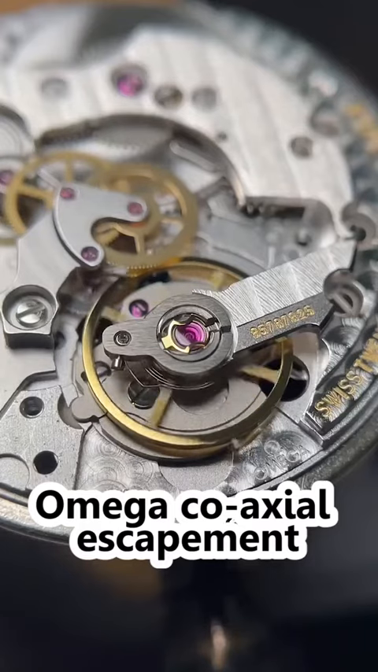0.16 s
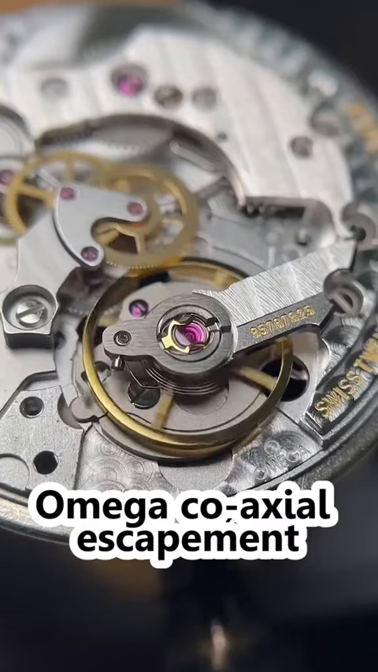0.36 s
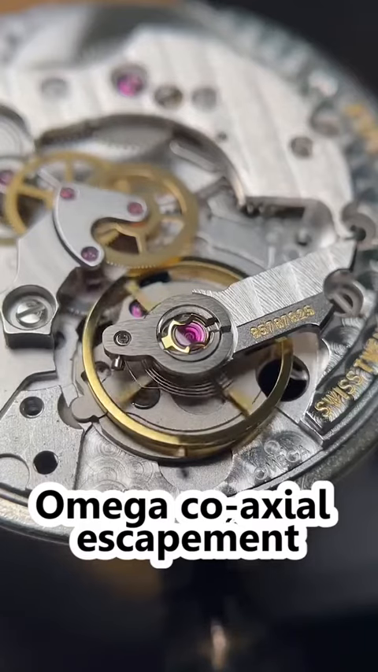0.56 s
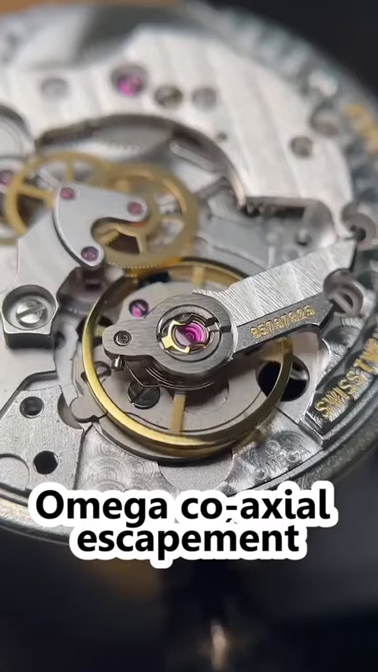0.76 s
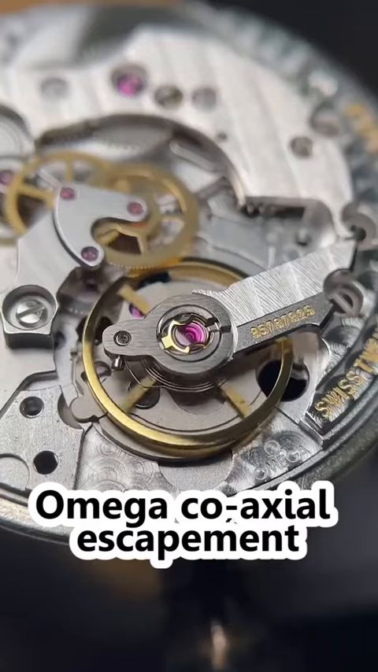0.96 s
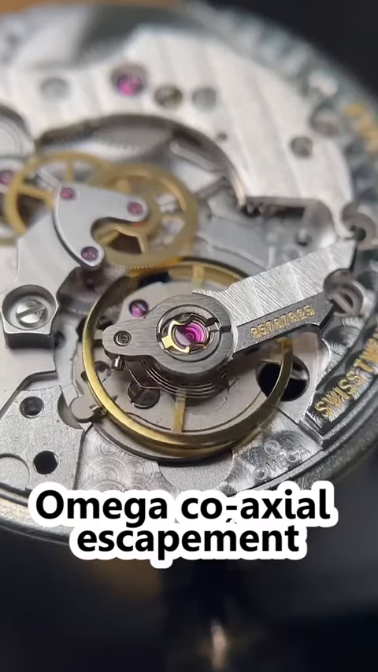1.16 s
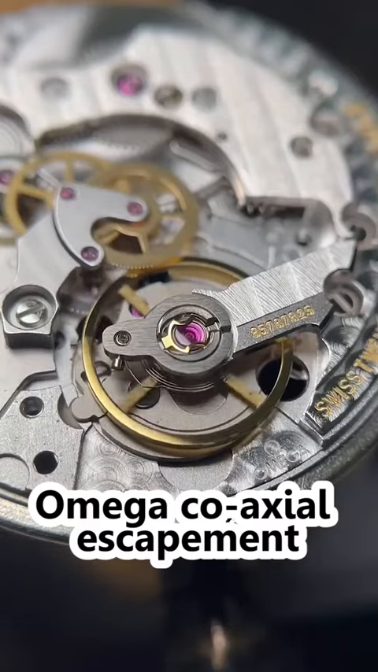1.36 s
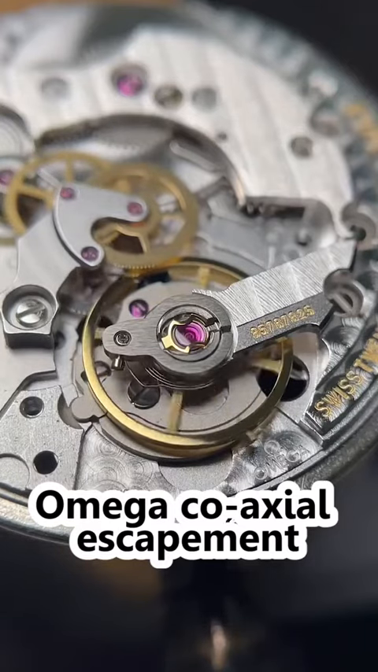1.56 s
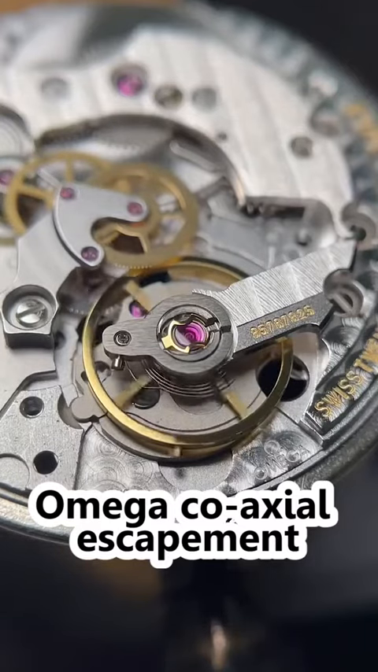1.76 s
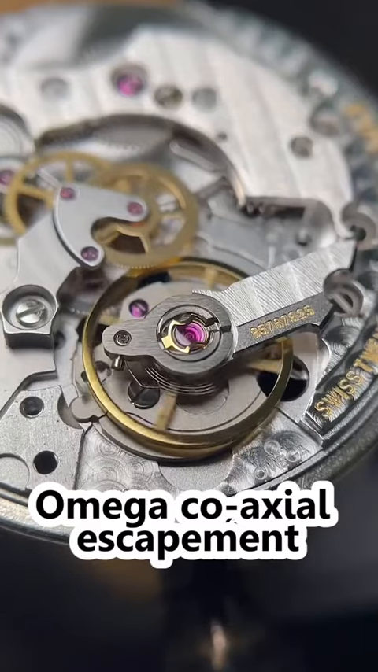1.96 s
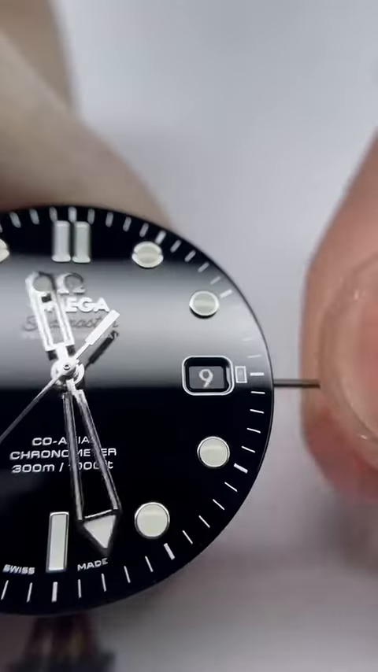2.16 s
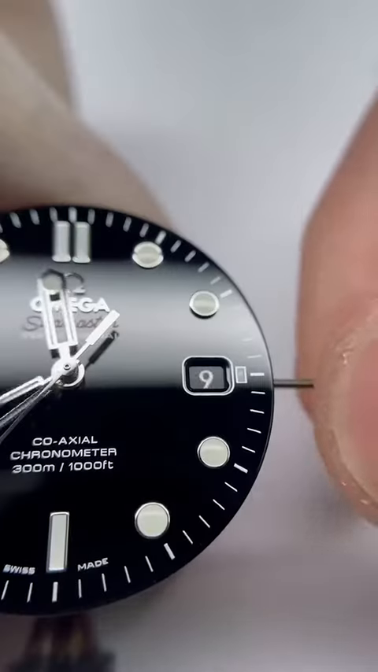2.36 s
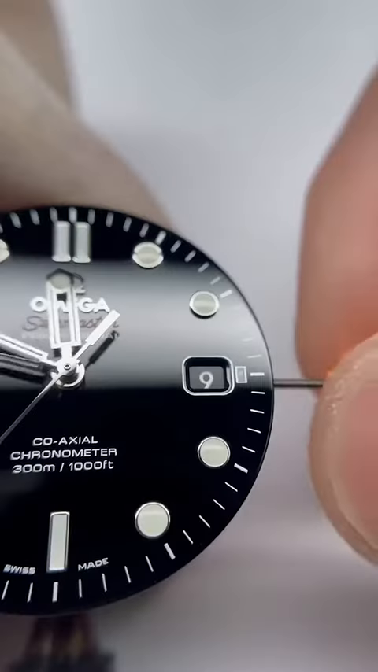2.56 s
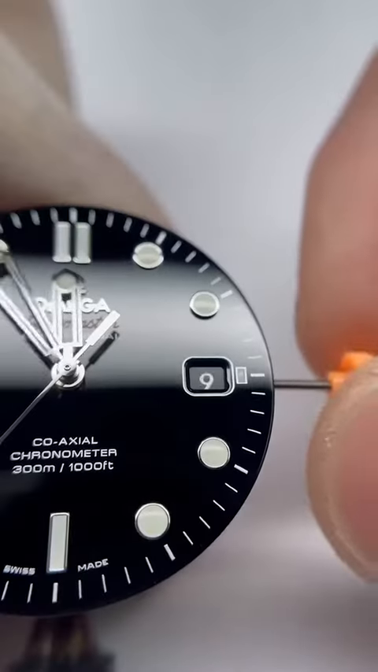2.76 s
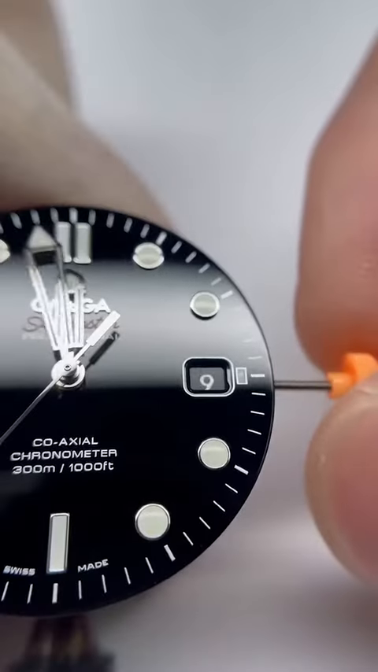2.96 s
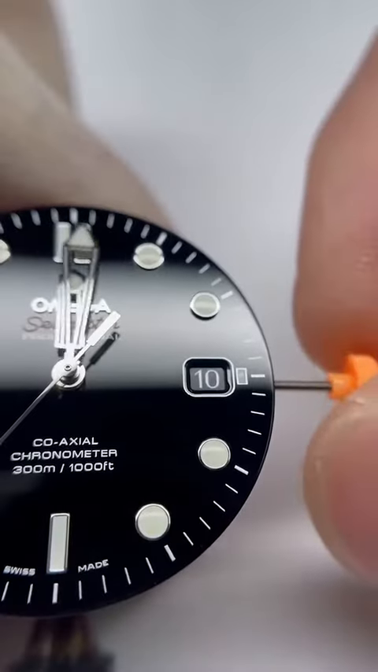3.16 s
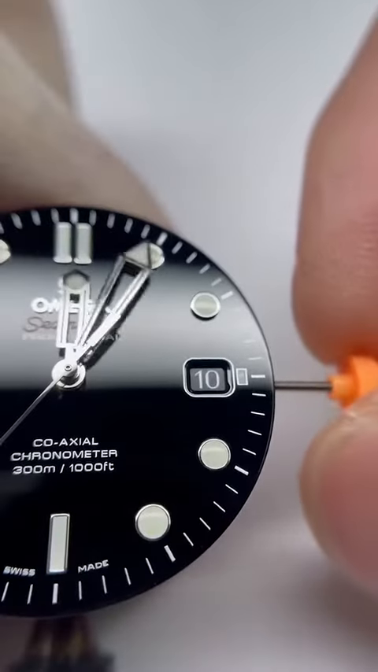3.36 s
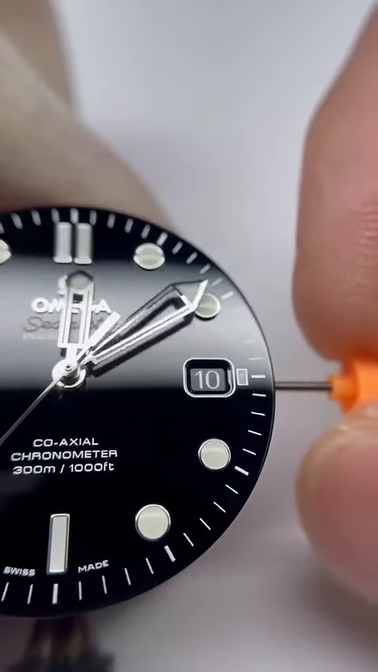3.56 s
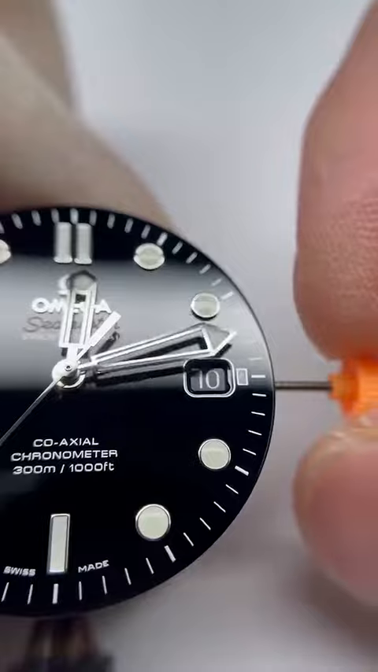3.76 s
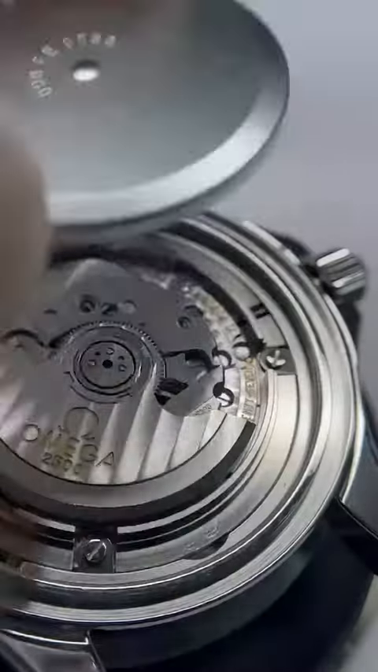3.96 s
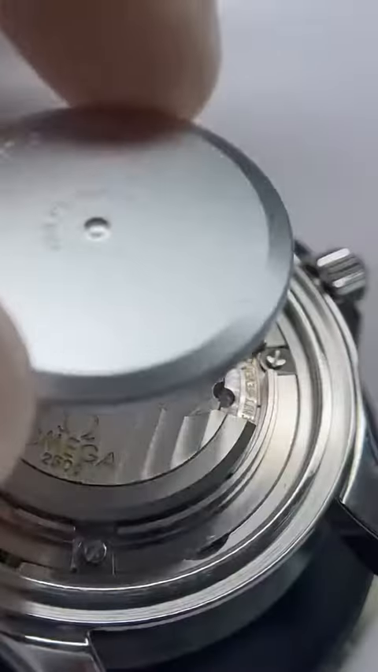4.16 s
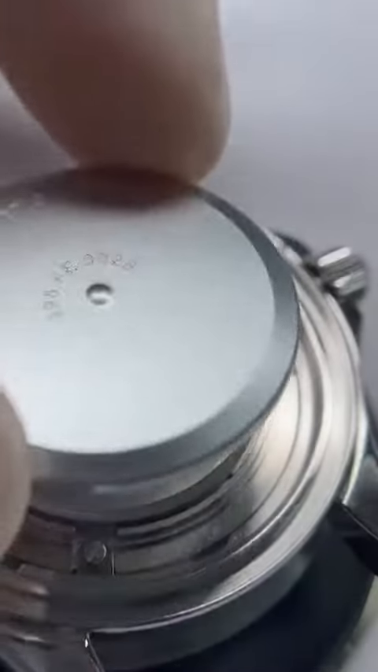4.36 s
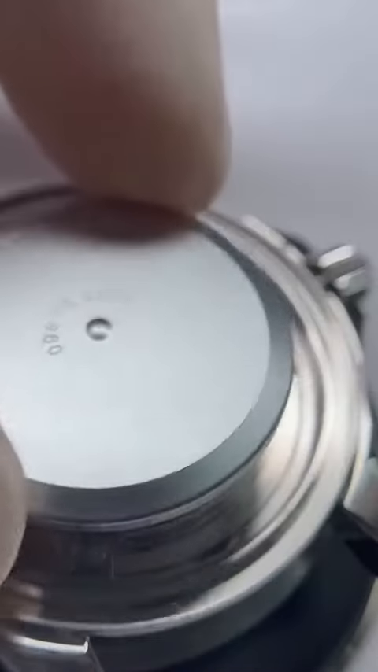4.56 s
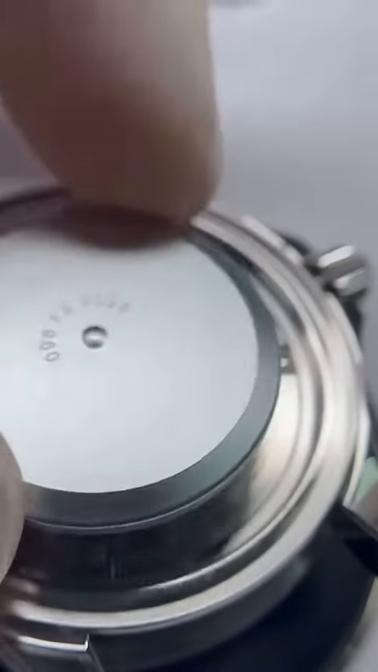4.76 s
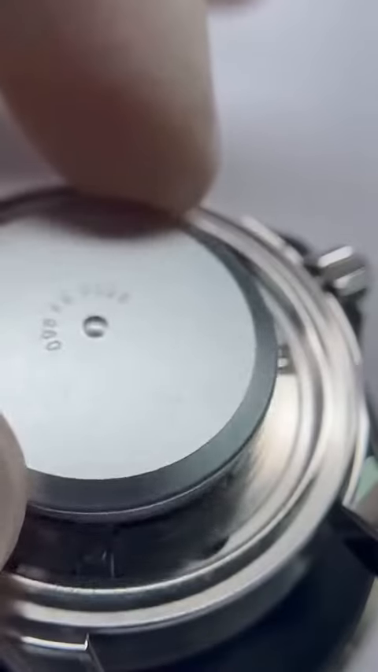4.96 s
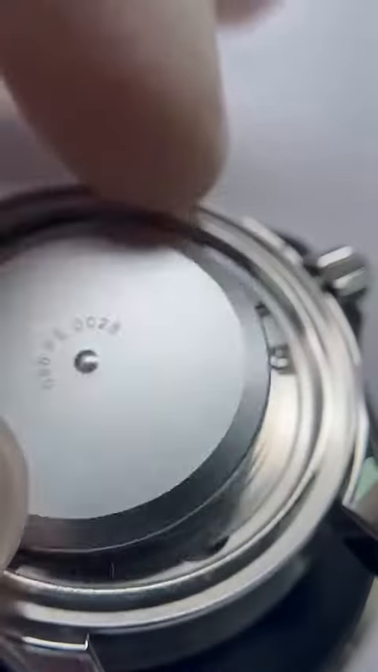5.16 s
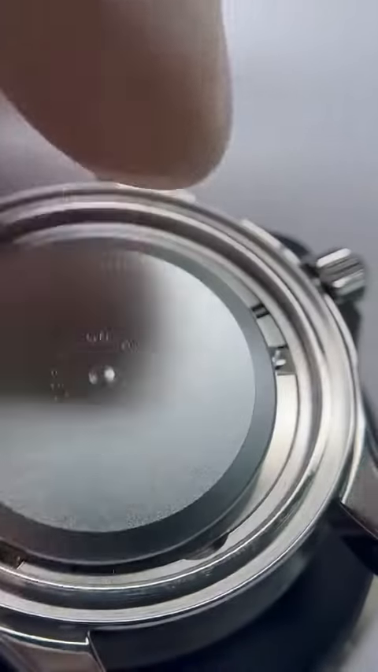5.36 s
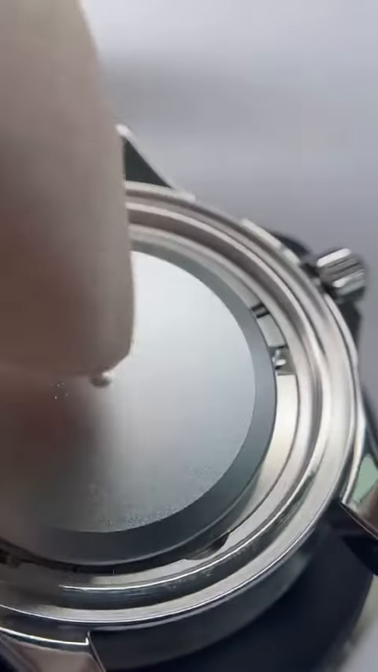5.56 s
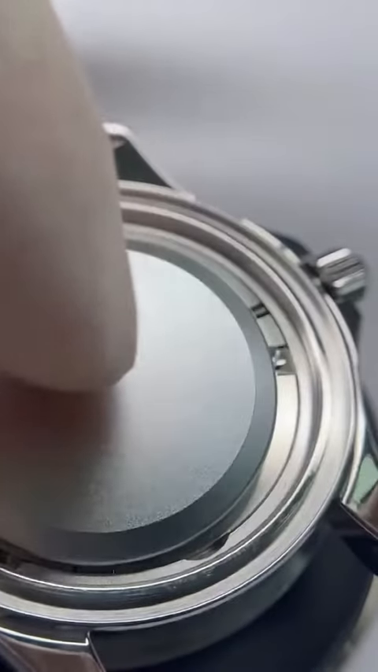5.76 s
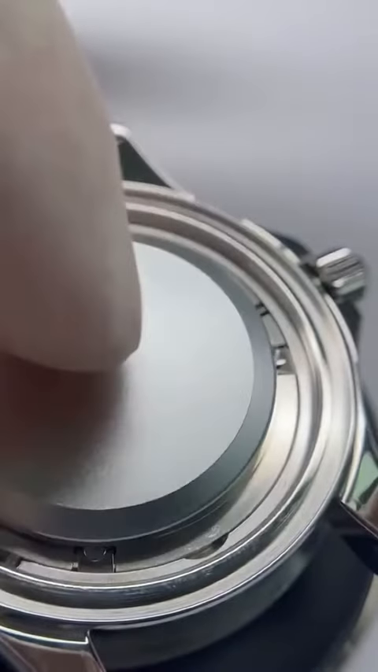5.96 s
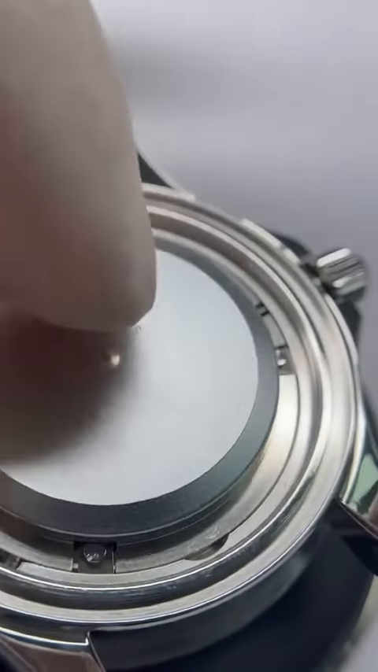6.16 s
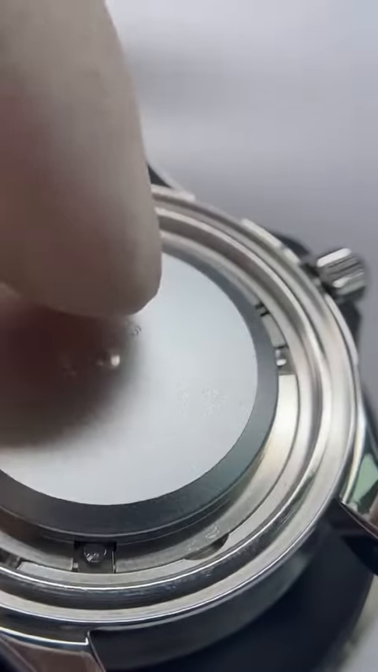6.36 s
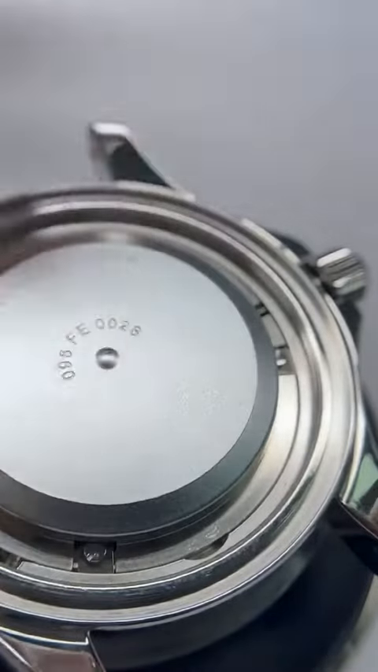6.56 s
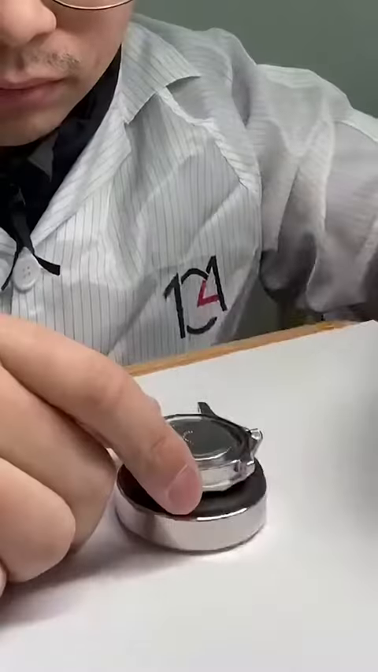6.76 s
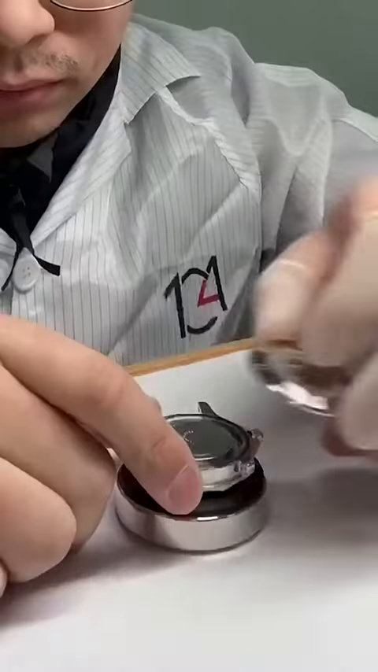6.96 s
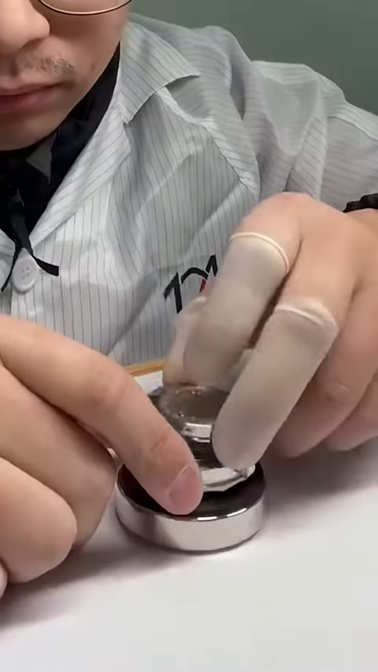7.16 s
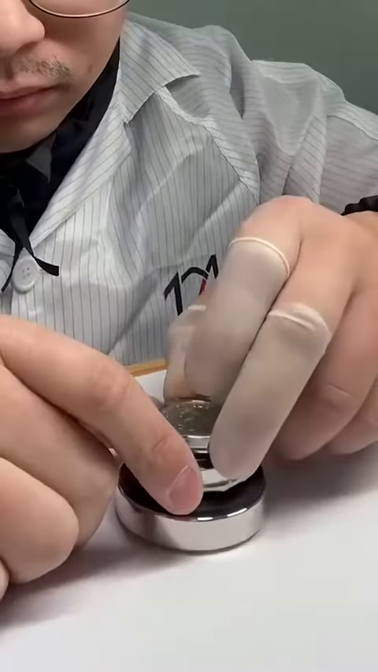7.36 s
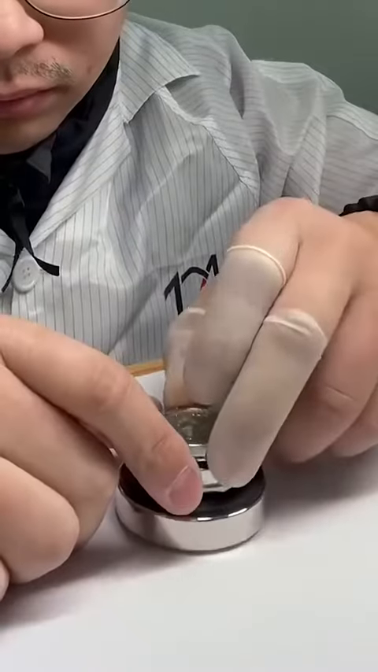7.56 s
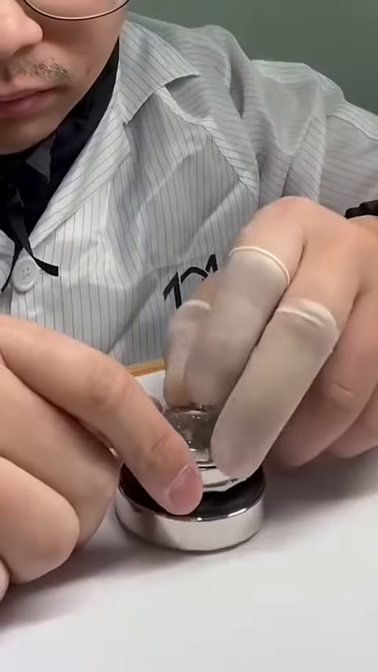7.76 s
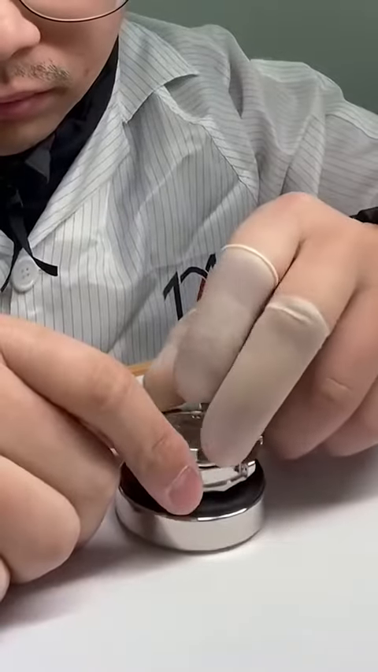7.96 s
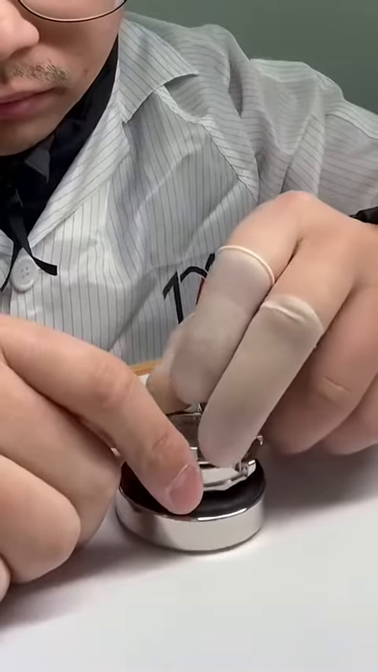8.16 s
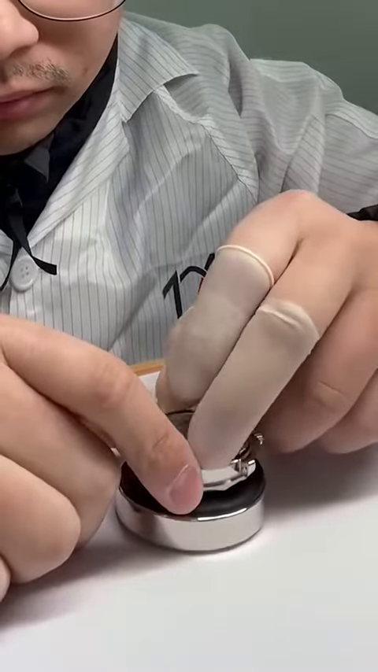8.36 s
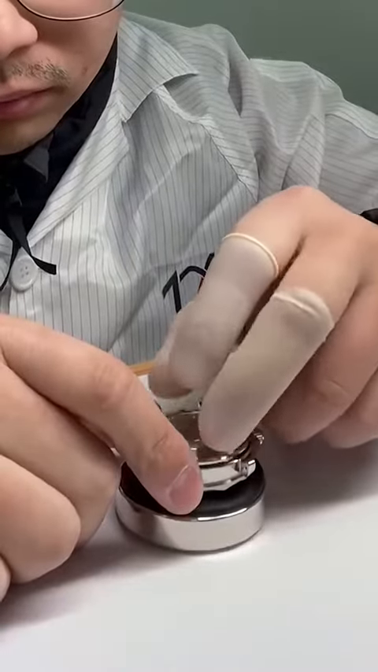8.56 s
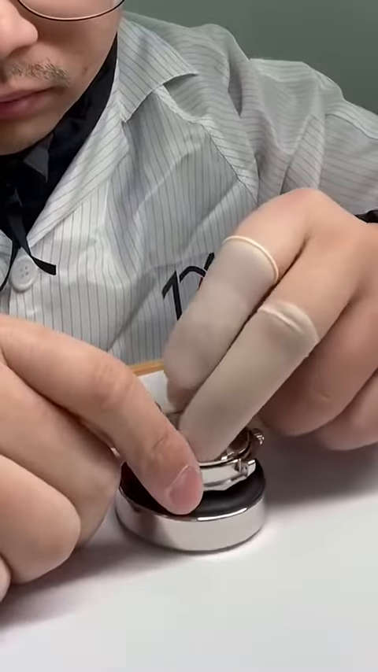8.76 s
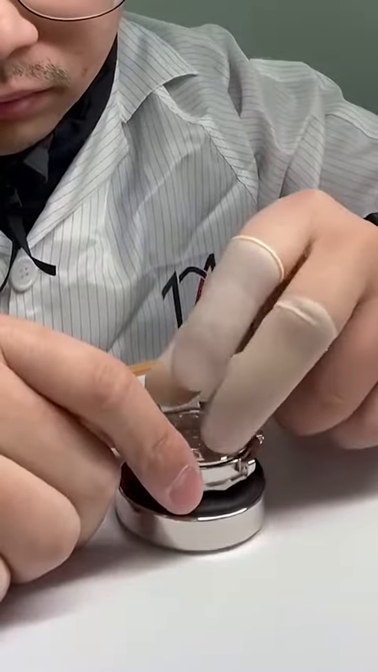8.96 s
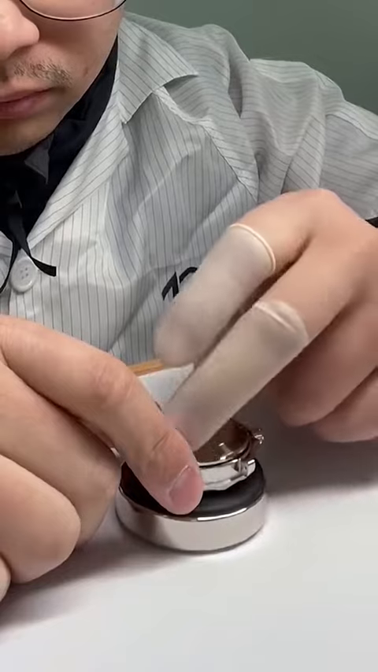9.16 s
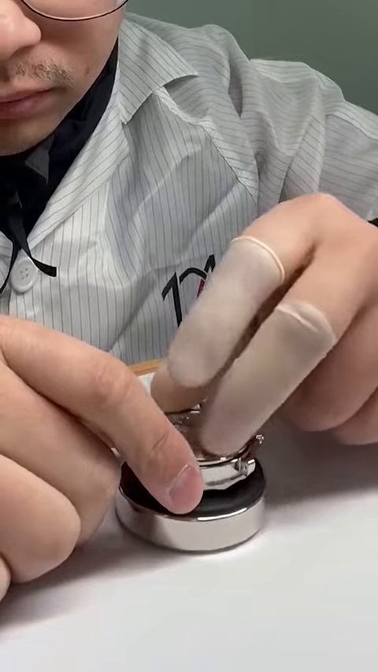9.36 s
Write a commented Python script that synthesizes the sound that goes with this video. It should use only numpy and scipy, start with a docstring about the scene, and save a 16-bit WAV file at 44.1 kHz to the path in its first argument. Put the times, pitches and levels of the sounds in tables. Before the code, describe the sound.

A watch ticks rapidly and its stem snaps out, then a thin steel cover clatters into place and the case back clicks shut.

```python
"""A bare watch escapement ticks seven times a second, close by, over a soft room tone and mains hum. The
winding stem snaps out with a thump, and later the movement ticks faintly inside its case. A thin steel inner
cover clatters onto the case, each impact exciting its bending modes. Last, the heavy back is set down and
turned: it clicks by impact and scrapes by friction in its thread. The room tone changes its colour in four
stretches."""
import sys
import numpy as np
from scipy import signal
from scipy.fft import rfft, irfft, next_fast_len
from scipy.io import wavfile
from scipy.ndimage import uniform_filter1d

SR = 44100
rng = np.random.default_rng(int(sys.argv[2]) if len(sys.argv) > 2 else 0)


def int16_out(signal):
    """Quantize to a 16-bit WAV file."""
    q = np.round(np.clip(np.atleast_2d(signal).T, -1, 1) * 32767)
    wavfile.write(sys.argv[1], SR, q.astype(np.int16))


N = 415863
T = np.arange(N) / SR
RING_T = T[:3 * SR // 5]  # time axis of a free decay
LEAD = SR // 50  # samples ahead of a contact's peak

# Boundaries of the four stretches of room tone, in seconds.
STRETCH_EDGES_S = [0, 1.648, 3.37, 6.15, 9.6]
# Level of the room tone in each stretch, in dB.
AIR_LEVELS_DB = [-54.5, -49, -53.5, -57.5]
# Room tone spectra of the four stretches. Each row: frequency in Hz, relative level in dB.
AIR_FIRST = [(12, -35), (20, 11), (58, -7), (146, -13), (198, -11.5), (718, -16), (849, -17),
             (1030, -17), (2390, -25.5), (2670, -23), (3340, -26), (4670, -22), (6720, -35.5),
             (9670, -28), (16000, -40)]
AIR_SECOND = [(12, -24.5), (20, 6), (39, -6.5), (96, -20), (182, -13.5), (472, -14), (642, -21.5),
              (738, -16.5), (3740, -42.5), (4300, -43), (5080, -45.5), (16000, -50)]
AIR_THIRD = [(12, -23), (20, 0.5), (120, -29), (241, -27), (624, -35), (678, -28.5), (759, -34),
             (923, -32.5), (2600, -43.5), (3160, -42.5), (16000, -53)]
AIR_FOURTH = [(12, -68), (20, 1.5), (53, -2), (107, -20), (130, -11), (248, -12), (558, -15),
              (825, -14.5), (1060, -17), (1220, -15), (2910, -28.5), (16000, -38.5)]
# Mains harmonics. Each row: frequency in Hz, level in dB.
HUM_PARTIALS = [(50, -57.5), (100, -64.5), (200, -71.5), (850, -71), (950, -71.5), (1250, -73.5)]

# Dull bumps of handling. Each row: centre in seconds, level in dB, width in seconds.
HAND_BUMPS = [(2.68, -43, 0.051), (3.36, -44, 0.023), (5.84, -55, .025), (6.02, -53, 0.031)]
# Spectra of a bump and of a brush of the hand. Each row: frequency in Hz, relative level in dB.
BUMP_SPECTRUM = [(25, 12.5), (110, -4.5), (300, -11), (1200, -40), (8000, -62)]
BRUSH_SPECTRUM = [(400, -17), (1000, 1.5), (2300, 1.5), (5000, -5.5), (9000, -16), (16000, -17)]

# Responses of the movement plate, the stem, steel on steel, and the case clamped in its holder.
# Each row: frequency in Hz, relative level in dB.
PLATE_SPECTRUM = [(700, -18.5), (1500, 2), (2400, -4), (2800, 1), (3300, -3), (4000, 4.5), (4700, 6.5),
                  (5600, -1), (6700, -16.5), (8300, -6), (9200, 6), (11000, -1.5), (13000, -13.5),
                  (16000, -18)]
STEM_SPECTRUM = [(70, -8.5), (170, 0), (340, -3), (550, -8.5), (1000, -10), (1900, 0), (2750, 4),
                 (3100, -13), (4500, -4), (7000, -8.5), (8000, 2.5), (10500, -6.5), (12000, -5.5),
                 (16000, -11)]
CLACK_SPECTRUM = [(130, -22), (380, -16), (680, -5), (1050, -6.5), (1700, -3.5), (2500, -2.5), (2900, 0),
                  (3600, -9), (4200, 14.5), (5000, -9), (5700, 5.5), (6500, 1.5), (7800, 0.5), (13000, -6)]
CASE_SPECTRUM = [(130, -18), (450, -10.5), (1000, 4), (1800, 0), (2300, 7.5), (3200, -5.5), (4450, 2.5),
                 (5100, -7.5), (7200, 0), (9500, -5), (11000, -10), (12000, -1.5), (12900, -0.5),
                 (13500, -16)]

# Modes of the escapement's fine steel parts, the hairspring, the case with its back, and the cover.
# Each row: frequency in Hz, relative level in dB, t60 in seconds.
FINE_PART_MODES = [(9150, -13, .2), (11900, -22, .3)]
HAIRSPRING_MODES = [(4780, -68, .7), (4900, -66, .7)]
CASE_BACK_MODES = [(2180, -13, .025), (2560, -14, .02), (4480, -17, .015), (6800, -18, .02),
                   (11800, -14, .025), (12380, -13, .028), (2350, -42, .28), (7250, -39, .25),
                   (12600, -35, .14)]
COVER_CLACK_MODES = [(4100, -15.5, 0.042), (7300, -13, 0.044), (7040, -10, 0.04), (7550, -7, 0.14),
                     (7700, -9, 0.053), (7970, -8, 0.057), (8290, -8, 0.044), (9900, -13, 0.066),
                     (11250, -11.5, 0.045), (11170, -15.5, .06)]

# Knocks of the back on the case. Each row: time in seconds, strength in dB, holder's thud gain in dB.
CASE_KNOCKS = [(6.9998, -14.5, -14), (7.1030, -12.5, 3.5), (7.1500, -33.5, -14), (7.1567, -31.5, -8),
               (7.4500, -20, 1), (7.6003, -20.5, 0.5), (7.838, -34.5, -8.5), (7.9, -42.5, -13),
               (8.0562, -14, 7.5), (8.0828, -9.5, 24.5), (8.205, -21.5, -1), (8.413, -13.5, -6),
               (8.5795, -36, -1), (8.7500, -20, -3.5), (8.8051, -30.5, -23), (8.867, -23, -11.5),
               (8.9144, -30.5, -15), (9.0975, -19.5, -8), (9.143, -30.5, -18), (9.2300, -23, -1),
               (9.4101, -31, -15)]
# Turns of the back in its thread. Each row: start in seconds, end in seconds, level in dB.
THREAD_TURNS = [(7.796, 7.906, -61), (8.142, 8.237, -55.5), (8.484, 8.572, -52.5), (8.815, 8.902, -51.5),
                (9.131, 9.212, -45)]

# Hard blows of the cover on the case. Each row: time in seconds, clack strength in dB,
# tilt in dB per octave, ring level in dB, ring t60 in seconds.
COVER_IMPACTS = [(4.535, -17.5, -0.5, -16.5, .08), (4.634, -23, -2.5, -18.5, .25),
                 (4.6478, -6.5, 1.5, -9, 0.16), (4.6504, -10, 5.5, -7.5, .07), (4.657, -10.5, 8.5, -19, .1),
                 (5.323, -27, -0.5, -25.5, 0.029), (5.3798, -19.5, 2, -19.5, .019),
                 (5.6115, -32.5, -5, -25.5, .051), (5.6172, -20.5, -2.5, -11.5, 0.094),
                 (5.6376, -12.5, -1.2, -28, .06)]
# The cover rattling to rest. Each row: start in seconds, length in seconds, first clack strength in dB,
# tilt in dB per octave, first ring level in dB, last ring level in dB, last ring t60 in seconds.
COVER_RATTLES = [(4.544, 0.036, -21, 0, -26, -43, 0.24), (4.6741, .097, -15, 2.5, -11.5, -42, 0.7),
                 (5.334, 0.039, -35, -4, -35.5, -59.5, .08), (5.401, .02, -35, -4.5, -38.5, -56, 0.09),
                 (5.6415, .017, -17.5, -0.5, -22.5, -44, 0.24)]

BEATS_PER_S = 7
BEND_HZ = 4312  # the cover's bending note
LN_1000 = np.log(1000)  # amplitude falls a thousandfold in one t60


def undb(db):
    """Amplitude grows tenfold for every 20 dB."""
    return 10 ** (np.asarray(db) / 20)


def unit(x):
    """Normalisation to an rms of 1."""
    return x / np.sqrt(np.mean(x ** 2))


def add(out, s, x):
    """Superposition: x joins out from s seconds on."""
    i = max(int(s * SR), 0)
    out[i:i + len(x)] += x[:max(N - i, 0)]


def decay(t60):
    """Exponential damping, 60 dB in t60 seconds."""
    return np.exp(-LN_1000 * RING_T / t60)


def colour(x, spectrum, tilt_db=0):
    """Minimum-phase filtering through (Hz, dB) points, tilted by tilt_db per octave."""
    size = next_fast_len(len(x), True) // 2 * 2
    log_hz = np.log2(np.maximum(np.fft.rfftfreq(size, 1 / SR), 1))
    hz, db = np.transpose(spectrum)
    octave = np.clip(log_hz, np.log2(hz[0]), np.log2(hz[-1]))
    gain = undb(np.interp(log_hz, np.log2(hz), db) + tilt_db * octave)
    cepstrum = irfft(np.log(gain))
    cepstrum[1:size // 2] *= 2  # folding the cepstrum makes the filter causal
    cepstrum[size // 2 + 1:] = 0
    return irfft(rfft(x, size) * np.exp(rfft(cepstrum)))[:len(x)]


def wander(rate):
    """Random modulation: straight lines join `rate` Gaussian values a second."""
    knots = rng.standard_normal(int(N / SR * rate) + 2)
    return np.interp(T * rate, np.arange(len(knots)), knots)


def stroke(start_s, end_s, attack_s, release_s):
    """A trapezoidal envelope rises before start_s, holds, and falls after end_s."""
    return np.clip(1 + np.minimum((T - start_s) / attack_s, (end_s - T) / release_s), 0, 1)


def grit(size, spread_db):
    """Surface roughness: dense tiny impacts of uneven strength merge into noise."""
    noise = rng.standard_normal(size)
    strength = np.repeat(rng.standard_normal(size // 16 + 1), 16)[:size]
    return unit(noise * undb(spread_db * strength))


def contact(spectrum, graze_s, t60, tilt_db=0, snap=20.0, size=8192):
    """Source and filter: rough faces graze, snap together and chatter; the body colours that force."""
    t = (np.arange(size) - LEAD) / SR
    envelope = np.exp(np.minimum(t / max(graze_s, 1e-4), -LN_1000 * t / t60))
    force = grit(size, spread_db=0) * envelope
    force[LEAD] += snap
    return unit(colour(force, spectrum, tilt_db)) * np.sqrt(np.mean(envelope ** 2))


def ring(modes, tilt_db=0, detune=0):
    """Modal decay: each blow lands elsewhere and weights the modes anew, and the grip detunes them."""
    out = np.zeros(len(RING_T))
    for hz, db, t60 in modes:
        gain = undb(db + tilt_db * np.log2(hz / BEND_HZ) + 2 * rng.standard_normal())
        detuned_hz = hz * (1 + detune * rng.standard_normal())
        out += gain * decay(t60) * np.sin(2 * np.pi * detuned_hz * RING_T) * rng.choice([-1, 1])
    return out


def room(x, early_db, early_t60, late_db, late_t60, treble_t60):
    """Reverberation: early reflections from the bench, then a faint tail whose treble dies first."""
    early, low, high = rng.standard_normal((3, len(RING_T)))
    low = signal.sosfilt(signal.butter(2, 5500, fs=SR, output="sos"), low)
    high = signal.sosfilt(signal.butter(2, 5500, "high", fs=SR, output="sos"), high)
    arrived = RING_T > .002
    bench = undb(early_db) * unit(arrived * early * decay(early_t60))
    tail = undb(late_db) * unit(arrived * (low * decay(late_t60) + high * decay(treble_t60)))
    return x + signal.fftconvolve(x, (bench + tail) / np.sqrt(len(RING_T)))[:N]


def room_tone():
    """Broadband noise gives each stretch its air and rumble; mains harmonics hum in the first and last."""
    gates = [uniform_filter1d(1. * ((T >= start) & (T < end)), size=400)
             for start, end in zip(STRETCH_EDGES_S, STRETCH_EDGES_S[1:])]
    spectra = [AIR_FIRST, AIR_SECOND, AIR_THIRD, AIR_FOURTH]
    air, hum = np.zeros((2, N))
    for gate, db, spectrum in zip(gates, AIR_LEVELS_DB, spectra):
        gain = gate * undb(db + 1.6 * wander(rate=2.7))
        air += gain * unit(colour(rng.standard_normal(N), spectrum))
    for hz, db in HUM_PARTIALS:
        amplitude = np.sqrt(2) * undb(db + 2.45 * wander(rate=3))
        hum += amplitude * np.sin(2 * np.pi * (hz * T + rng.random()))
    return air + hum * (gates[0] + undb(-2.5) * gates[-1])


def handling():
    """Soft contact excites mostly low frequencies: hands bump the watch, then brush it by friction."""
    pressure = stroke(6.394, 6.56, attack_s=.2, release_s=.091) * undb(-57.5 + 2 * wander(rate=58))
    brush = pressure * unit(colour(grit(N, spread_db=3), BRUSH_SPECTRUM))
    push = sum(undb(db) * np.exp(-((T - s) / width) ** 2) for s, db, width in HAND_BUMPS)
    return brush + push * unit(colour(rng.standard_normal(N), BUMP_SPECTRUM))


def cased_ticks(first_s=3.424):
    """Transmission loss: the case lets out only a faint high tick of the movement."""
    out = np.zeros(N)
    for k in range(14):
        tick = contact([(3000, -20), (7000, -6.5), (12000, -2.5)], graze_s=.005, t60=.055, snap=.92)
        add(out, first_s + k / BEATS_PER_S - LEAD / SR, undb(-61 + rng.standard_normal()) * tick)
    return out


def escapement(first_s=.0729, tock_early_s=.002, tock_drop_db=1.7, ring_fall_db_per_s=10):
    """Impact excitation: each beat unlocks the wheel and drops it on a jewel; the fine parts ring on."""
    out = np.zeros(N)
    end_s = STRETCH_EDGES_S[1]
    for k in range(int(end_s * BEATS_PER_S) + 1):
        tock = k % 2
        s = first_s + k / BEATS_PER_S - tock * tock_early_s
        click_db = -30.5 - tock * tock_drop_db - 1.06 * rng.standard_normal()
        ring_db = -37.5 - ring_fall_db_per_s * s - tock * tock_drop_db + 5 * rng.standard_normal()
        unlock = contact(PLATE_SPECTRUM, graze_s=.0048, t60=.018)
        tooth_tilt_db = 1.2 * rng.standard_normal()  # each tooth has its own brightness
        drop = contact(PLATE_SPECTRUM, graze_s=.002, t60=.026, tilt_db=tooth_tilt_db, snap=6.4)
        add(out, s - .0055 - LEAD / SR, undb(click_db - 15.5) * unlock)
        add(out, s - LEAD / SR, undb(click_db - 2) * drop)
        add(out, s, undb(ring_db) * ring(FINE_PART_MODES) + ring(HAIRSPRING_MODES))
    out = room(out, early_db=-15.5, early_t60=.061, late_db=-17.5, late_t60=.52, treble_t60=.2)
    return out * (T < end_s + .004)


def stem(snap_s=2.5565, thump_hz=248, thump_width_s=.0028):
    """Recoil: the stem snaps out to its setting notch and the movement jolts once in the fingers."""
    out = np.zeros(N)
    add(out, snap_s - LEAD / SR, undb(-15) * contact(STEM_SPECTRUM, graze_s=.0011, t60=.02, snap=1.8))
    t = T - snap_s
    out += undb(-20) * np.sin(2 * np.pi * thump_hz * t) * np.exp(-(t / thump_width_s) ** 2)
    return room(out, early_db=-24, early_t60=.056, late_db=-28.5, late_t60=.42, treble_t60=.16)


def knock(db, thud_db, t60, medium_db=-19):
    """Elastic impact of the back on the case: the harder it is, the more sudden and the brighter."""
    force_db = db - medium_db
    tilt_db = .4234 * force_db
    graze_s = .0014 * 2 ** (-force_db / 12)
    # a downward push also drives the holder, which answers in the low middle
    body = [(hz, gain_db + thud_db / (1 + (hz / 1400) ** 4)) for hz, gain_db in CASE_SPECTRUM]
    out = np.pad(undb(db) * ring(CASE_BACK_MODES, tilt_db, detune=.0178), (LEAD, 0))
    add(out, 0, undb(db - 4) * contact(body, graze_s, t60, tilt_db, snap=4.8))
    return out


def case_back(loose_until_s=7.8, seated_from_s=8.2, rebound_s=.017):
    """Impact and sliding friction: the back, damped by the fingers, clicks and scrapes in its thread."""
    out = np.zeros(N)
    for s, db, thud_db in CASE_KNOCKS:
        t60 = np.interp(s, [loose_until_s, seated_from_s], [.039, .018])  # a loose back chatters longer
        add(out, s - LEAD / SR, knock(db, thud_db, t60))
        if s < seated_from_s:
            add(out, s + rebound_s - LEAD / SR, undb(-16) * knock(db, thud_db, t60))
    pressure = sum(undb(db) * stroke(start, end, attack_s=.04, release_s=.033)
                   for start, end, db in THREAD_TURNS)
    flicker = undb(2.1 * wander(rate=150))
    scrape = unit(colour(grit(N, spread_db=5), CASE_SPECTRUM, tilt_db=-2.5))
    out += pressure * flicker * scrape
    return room(out, early_db=-16.5, early_t60=.076, late_db=-20, late_t60=.68, treble_t60=.18)


def bounces(mean_gap_s=.012, jitter_s=.001, bounce_t60=.19):
    """Inelastic rebound: the cover's contacts grow quicker and weaker. Rows are as in COVER_IMPACTS."""
    for start, length, clack_db, tilt_db, ring_db, last_db, last_t60 in COVER_RATTLES:
        gaps = max(round(length / mean_gap_s), 1)
        for k, (later, harder) in enumerate(rng.standard_normal((gaps + 1, 2))):
            progress = 1 - (1 - k / gaps) ** 1.15
            s = start + length * progress + jitter_s * later
            faded_clack_db = clack_db - 25.5 * progress ** 2.6 + .85 * harder
            faded_ring_db = ring_db + (last_db - ring_db) * progress ** 3.5
            yield s, faded_clack_db, tilt_db, faded_ring_db, bounce_t60 if k < gaps else last_t60


def cover(twin_below_hz=55, twin_db=-7.5):
    """Bending vibration of a thin disc: each contact with the rim stops its ringing and restarts it."""
    out = np.zeros(N)
    hits = sorted([*map(tuple, COVER_IMPACTS), *bounces()])
    waits = np.diff([row[0] for row in hits], append=N / SR)
    for (s, clack_db, tilt_db, ring_db, t60), wait in zip(hits, waits):
        until_next_hit = np.exp(-np.maximum(RING_T - wait, 0) / .00092)
        # a tighter seat makes the bending note shorter and flatter, and mutes the other modes too
        hz = BEND_HZ * (1 - (.0055 / t60) ** 2)
        damping = np.exp(-2.5 * RING_T / t60)
        # the disc is not quite even, so the bending note has a slightly lower twin
        twin = undb(twin_db) * np.sin(2 * np.pi * ((hz - twin_below_hz) * RING_T + rng.random()))
        bend = undb(ring_db) * (np.sin(2 * np.pi * hz * RING_T) + twin) * decay(t60)
        modes = undb(clack_db - 6) * damping * ring(COVER_CLACK_MODES, tilt_db, detune=.0088)
        clack = contact(CLACK_SPECTRUM, graze_s=.001, t60=.02, tilt_db=tilt_db, snap=.94)
        add(out, s, until_next_hit * (bend + modes))
        add(out, s - LEAD / SR, undb(clack_db - 3) * clack)
    return room(out, early_db=-7.5, early_t60=.084, late_db=-24, late_t60=.5, treble_t60=.4)


def scene():
    """Superposition: the pressures of all sources add at one close microphone."""
    watch = escapement() + cased_ticks() + stem() + cover() + case_back()
    return (watch + handling() + room_tone())[None]


def record(dry):
    """Clipping and band limiting: peaks stop at full scale, then a steep low-pass cuts the top."""
    low_pass = signal.ellip(12, .2, 70, 15900, fs=SR, output="sos")
    return signal.sosfilt(low_pass, np.clip(dry, -1, 1))


dry = scene()
out = record(dry)
int16_out(out)
```